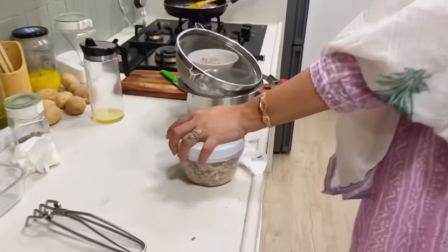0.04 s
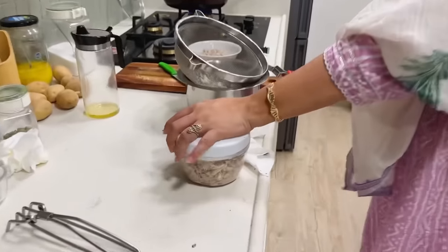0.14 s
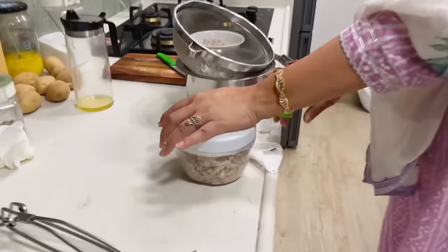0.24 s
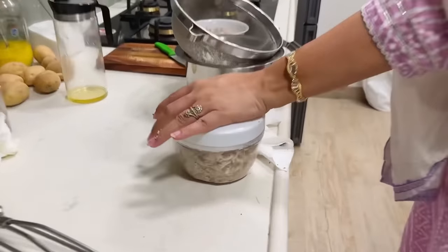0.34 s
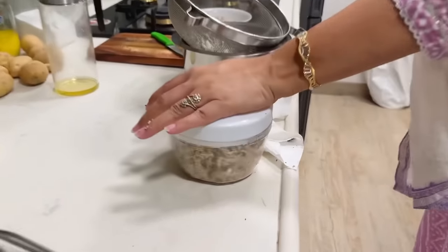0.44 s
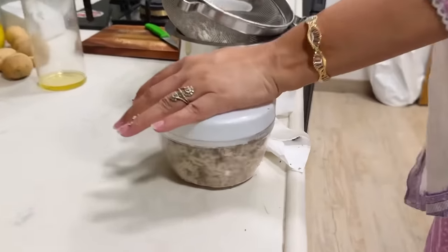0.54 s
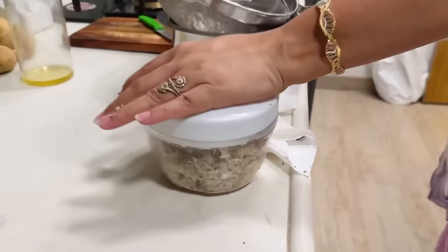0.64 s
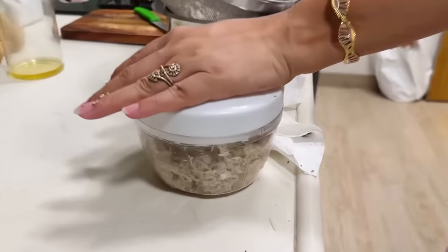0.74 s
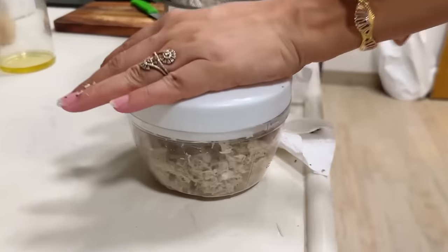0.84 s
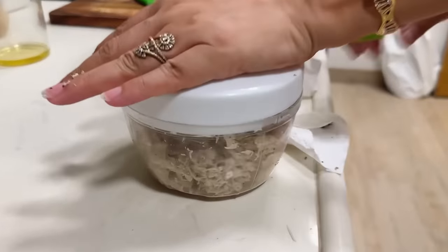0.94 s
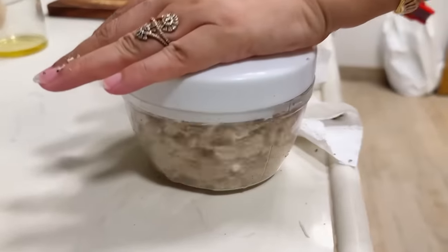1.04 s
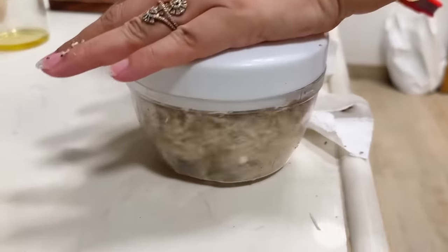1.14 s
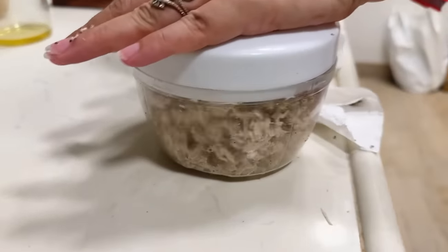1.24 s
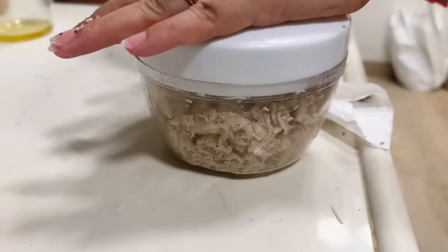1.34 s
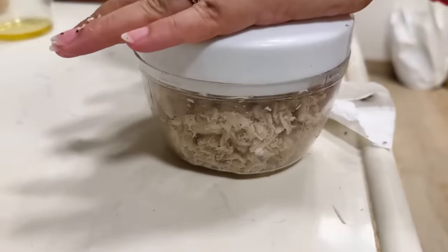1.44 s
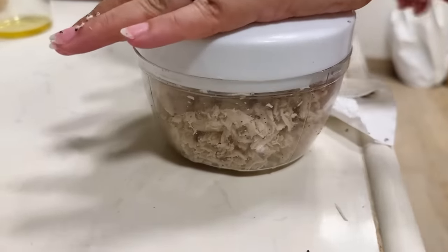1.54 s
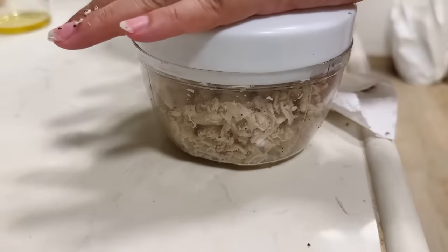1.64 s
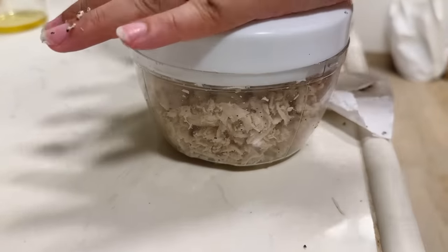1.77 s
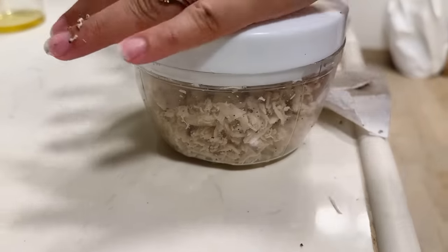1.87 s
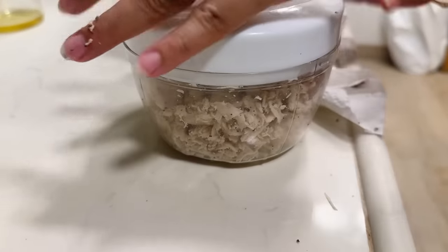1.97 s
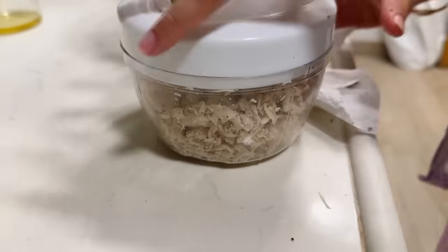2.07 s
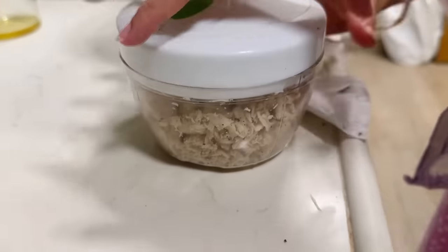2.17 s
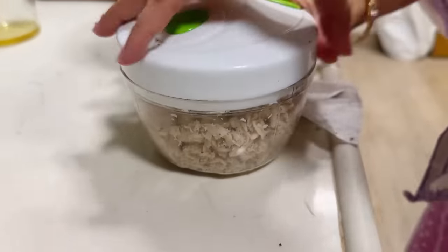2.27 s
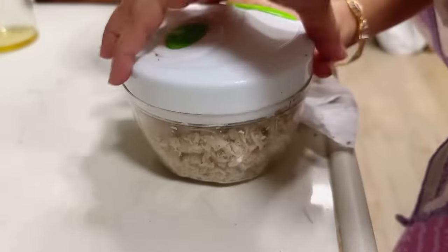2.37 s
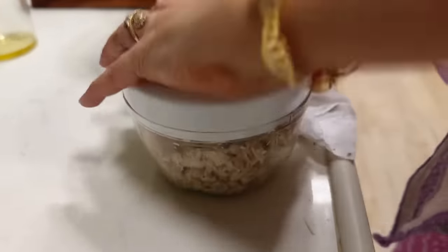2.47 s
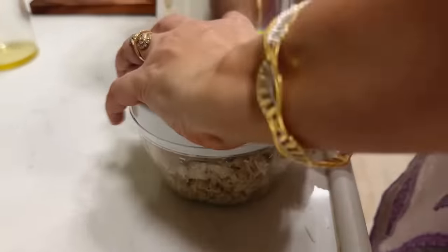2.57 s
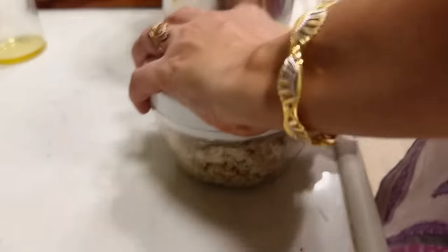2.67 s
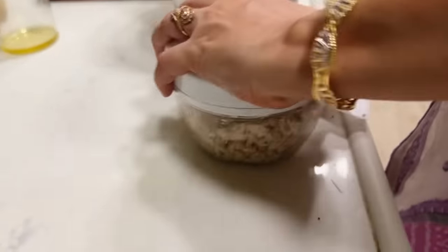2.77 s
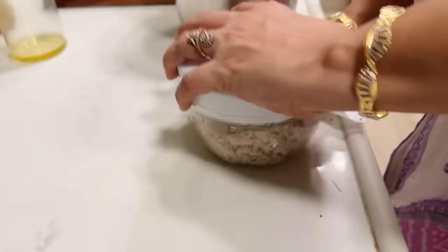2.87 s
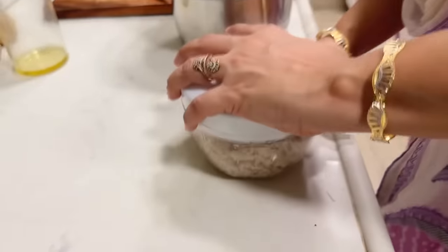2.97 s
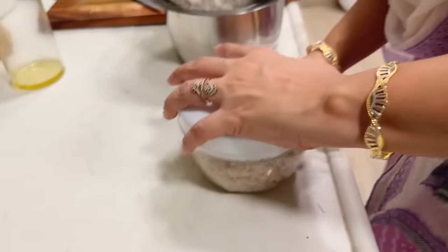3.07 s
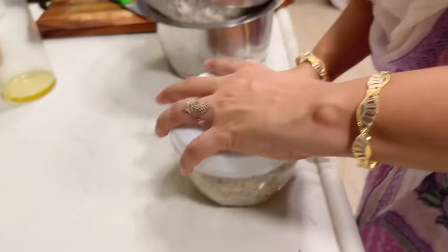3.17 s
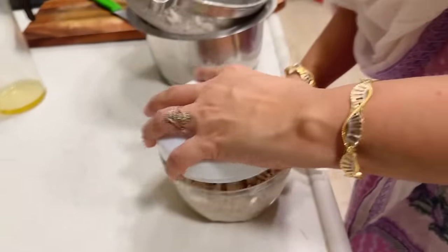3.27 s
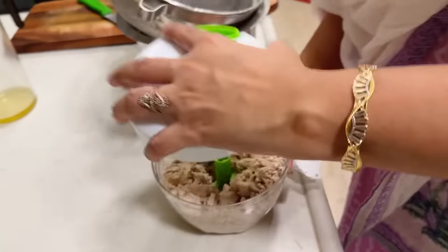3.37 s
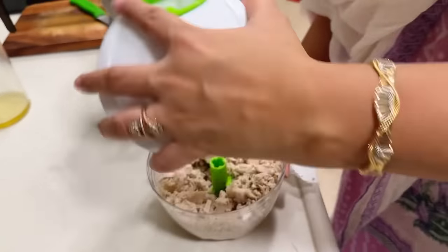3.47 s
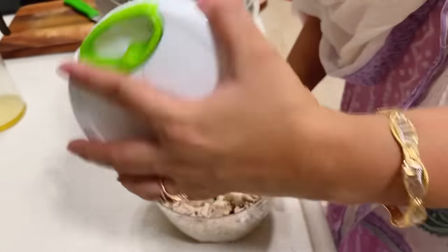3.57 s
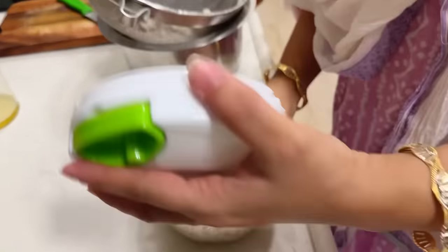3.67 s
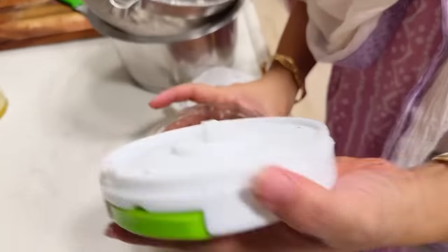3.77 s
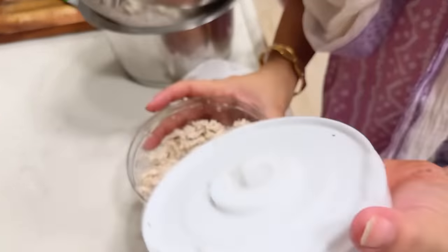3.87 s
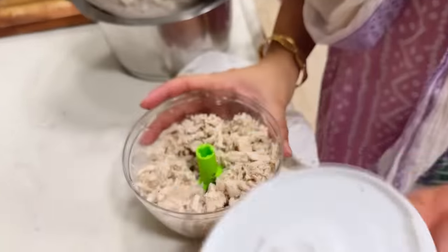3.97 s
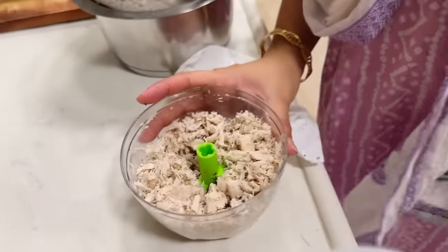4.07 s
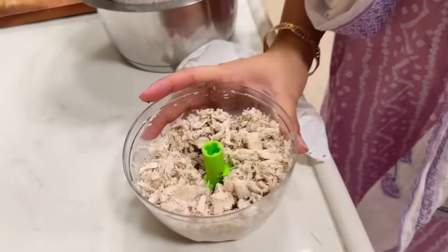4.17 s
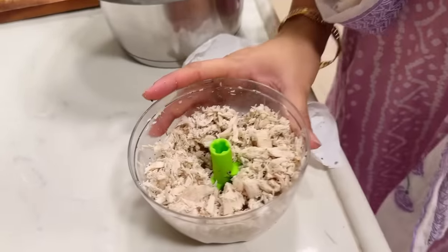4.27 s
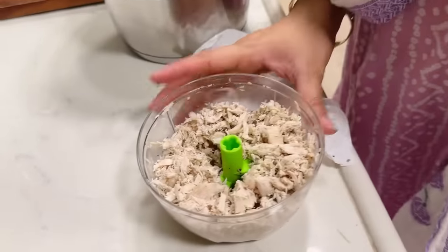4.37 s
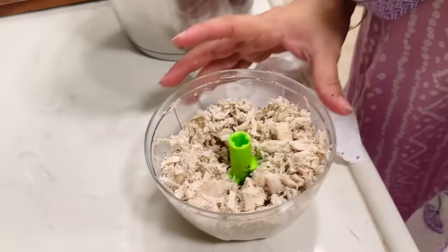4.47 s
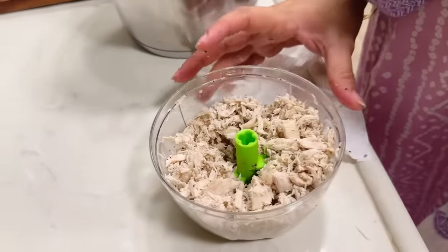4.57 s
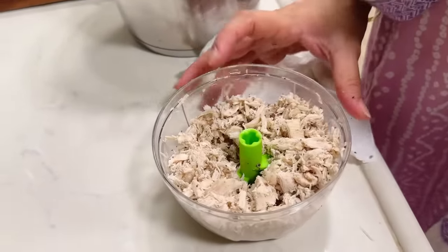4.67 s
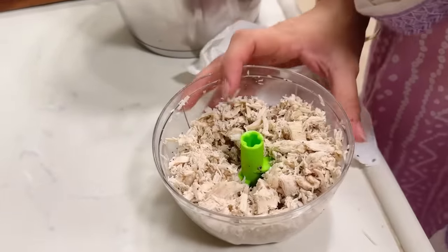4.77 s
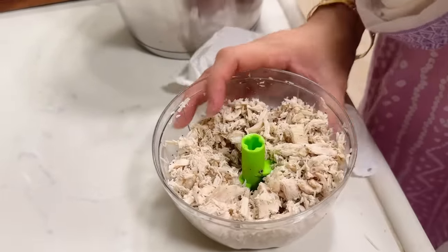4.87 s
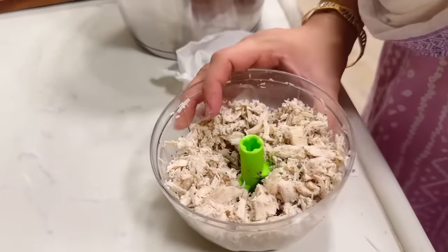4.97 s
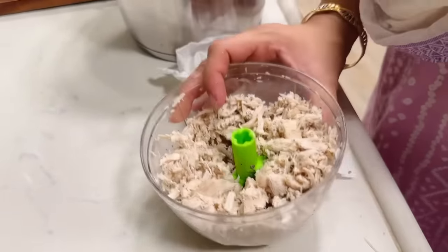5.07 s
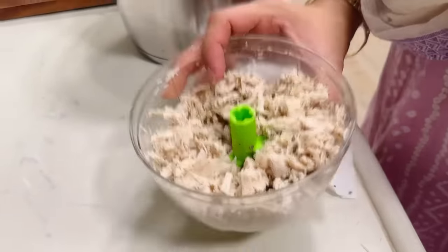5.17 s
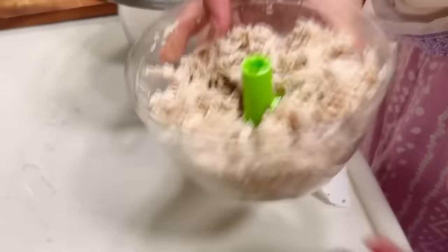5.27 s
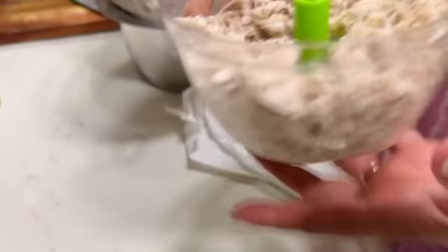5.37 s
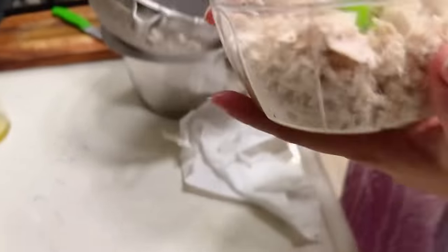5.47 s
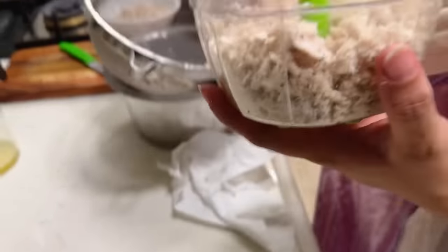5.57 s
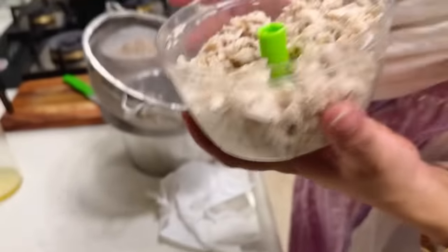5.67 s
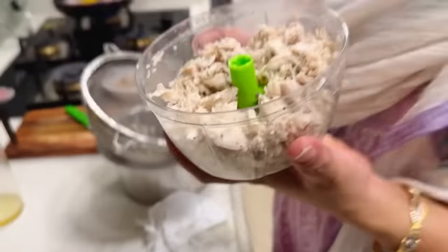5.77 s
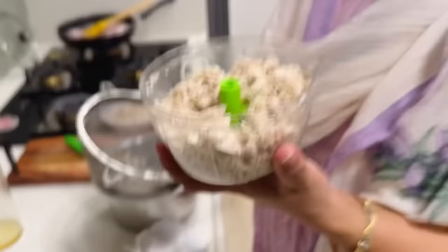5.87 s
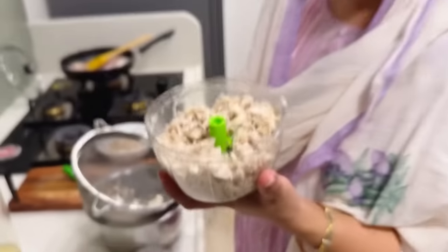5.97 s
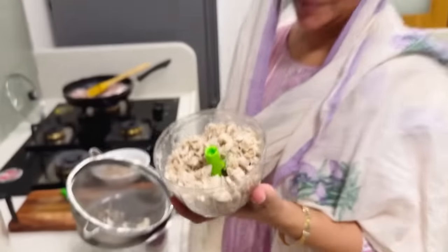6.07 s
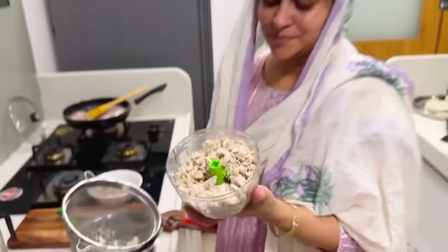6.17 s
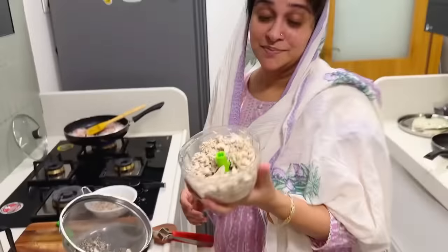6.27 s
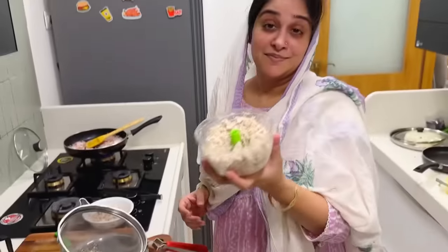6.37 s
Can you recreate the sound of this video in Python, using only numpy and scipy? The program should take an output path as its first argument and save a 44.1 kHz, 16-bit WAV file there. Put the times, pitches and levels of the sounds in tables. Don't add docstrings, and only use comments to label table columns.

```python
import sys
import numpy as np
from scipy import signal
from scipy.fft import rfft, irfft
from scipy.io import wavfile
from scipy.ndimage import uniform_filter1d

SR = 44100
rng = np.random.default_rng(int(sys.argv[2]) if len(sys.argv) > 2 else 0)


def voltage_ratio(decibels):
    exponent = np.asarray(decibels, float) / 20
    return 10 ** exponent


def transcribe(u):
    v = np.clip(np.atleast_2d(u).T, -1, 1)
    q = np.round(v * 32767).astype(np.int16)
    wavfile.write(sys.argv[1], SR, q)


N = 283286
T = np.arange(N) / SR


def along(table, n):
    hz, value = np.transpose(table)
    return np.interp(np.log(np.arange(n // 2 + 1) * SR / n + 1), np.log(hz), value)


def unit(x):
    return x / np.sqrt(np.mean(x ** 2))


def band(x, lo_hz, hi_hz):
    return signal.sosfilt(signal.butter(2, [lo_hz, min(hi_hz, SR / 2 - 100)], "band", fs=SR, output="sos"), x)


def decay(t, t60_s):
    return np.exp(-np.log(1000) * t / t60_s)


def body(x, modes):
    out = 0
    for k, (hz, width_hz, db) in enumerate(modes):
        out = out + (-1) ** k * voltage_ratio(db) * signal.lfilter(*signal.iirpeak(hz, hz / width_hz, fs=SR), x)
    return out


def widened(modes, factor):
    return [(hz, factor * width_hz + 60, db) for hz, width_hz, db in modes]


def grains(rate_hz, spread_db, fill):
    hit = rng.random(N) < rate_hz / SR
    clicks = hit * rng.standard_normal(N) * voltage_ratio(spread_db * np.minimum(rng.exponential(size=N), 4))
    return unit(clicks) + fill * rng.standard_normal(N)


def walk(rate_hz):
    k = int(SR / rate_hz)
    return uniform_filter1d(np.repeat(rng.standard_normal(N // k + 1), k), k)[:N]


def swell(rows, drop_db, bend):
    power = 0
    for start_s, top_s, end_s, db in rows:
        before = (top_s - T) / max(top_s - start_s, .002)
        after = (T - top_s) / max(end_s - top_s, .002)
        away = np.where(T < top_s, before, after)
        power = power + voltage_ratio(db - drop_db * away ** bend) ** 2
    return np.sqrt(power)


def add(out, s, x):
    i = int(s * SR)
    out[i:i + len(x)] += x[:N - i]


def strikes(table, spread, t60_s, gain_db, snap_db, crack_db):
    out, t = np.zeros(N), np.arange(5000) / SR
    for s, db, hz, contact_ms, bright_db in table:
        contact_s = np.clip(contact_ms, .2, 6) / 1000
        rise = 1 - np.exp(-(t / contact_s) ** 2)
        fade = rise * (np.exp(-t / (2.1 * contact_s + 0.00047)) + 0.25 * decay(t, 2.6 * t60_s))
        noise = rng.standard_normal((3, len(t))) * fade
        crowd = band(noise[0], hz / (1 + spread), hz * (1 + 1.47 * spread))
        ring = crowd / abs(crowd).max() + 0.91 * rise * np.sin(2 * np.pi * hz * t) * decay(t, t60_s)
        snap = band(band(noise[1], 900.0, 3200.0), 830.0, 3300.0)
        crack = band(noise[2], 2900.0, 13000.0)
        blow = ring / abs(ring).max()
        blow = blow + voltage_ratio(snap_db + bright_db + 2.0) * snap / abs(snap).max()
        blow = blow + voltage_ratio(crack_db + bright_db - 2.5) * crack / abs(crack).max()
        add(out, s + .0002, voltage_ratio(db + gain_db) * blow)
    return out


# (frequency [Hz], width [Hz], level [dB])
BOWL_MODES = [(361, 180, 15.5), (1050, 160, 3), (1223, 18, 4.5), (1880, 27, -9.5)]
RATCHET_MODES = [(860, 47, 2), (1300, 14, 4.5), (1600, 200, -2), (2235, 12, 2), (2200, 11, -2),
                 (2780, 600, -10), (3330, 44, -7.5), (3500, 24, -22)]
CORD_MODES = [(8140, 160, 8), (9640, 200, 9), (13500, 1500, -2)]
# (start [s], fastest [s], end [s], level [dB])
PULLS = [
    (-0.02, 0.14, 0.27, -40),
    (0.63, 0.725, 0.88, -31.5),
    (1.25, 1.36, 1.58, -29.5),
    (1.5, 1.64, 1.8, -46.5),
]
REWINDS = [
    (-0.07, 0.14, 0.25, -37),
    (0.25, 0.45, 0.6, -34),
    (0.62, 0.74, 0.86, -36),
    (0.9, 1.09, 1.23, -31),
]
JERKS = [
    (0.9, 0.911, 0.94, -24),
]
SNAPS = [
    (1.735, 1.76, 1.885, -22),
]
# (level [dB], drop at stroke ends [dB])
PULL_MIX = [(0, 16), (-10, 14), (-18, 8), (-8.5, 22)]
REWIND_MIX = [(-4, 20), (0, 17), (-12, 9), (-16, 14)]
JERK_MIX = [(-6, 26), (5, 25), (-17, 12), (-8, 26)]
SNAP_MIX = [(-30, 30), (-1, 24), (0, 25), (-8, 30)]


def chopper():
    kinds = [(PULLS, PULL_MIX, 1.7), (REWINDS, REWIND_MIX, 1.5), (JERKS, JERK_MIX, .95), (SNAPS, SNAP_MIX, .95)]
    thuds = grains(800., 2.4, .5)
    churn = body(thuds, widened(BOWL_MODES, 1.07)) + voltage_ratio(-25) * band(thuds, 130.0, 1400.0)
    ticks = grains(900., 2.5, .55)
    pawls = body(ticks, widened(RATCHET_MODES, 1.25)) + voltage_ratio(-22.5) * band(ticks, 470.0, 2000.0)
    scrape = band(grains(2500., 1.1, 1.0), 2530.0, 8700.0)
    rub = grains(1500., 1.7, .8)
    cord = body(rub, CORD_MODES) + voltage_ratio(-9) * band(rub, 10500.0, 18600.0)
    out = 0
    for k, layer in enumerate((churn, pawls, scrape, cord)):
        power = 0
        for rows, mix, bend in kinds:
            level_db, drop_db = mix[k]
            power = power + (voltage_ratio(level_db) * swell(rows, drop_db, bend)) ** 2
        out = out + np.sqrt(power) * unit(layer)
    return out


# (time [s], peak level [dB], ring [Hz], contact [ms], brightness [dB])
GEAR_KNOCKS = [(0.083, -24.5, 700, 2.5, 3), (0.127, -20.5, 503, 3.4, 0), (0.2755, -11, 777, 2.6, 3),
               (0.31, -26, 1385, 3, -12), (0.396, -14.5, 900, 1.2, -1), (0.407, -23.5, 1330, 2.2, 4),
               (0.458, -19, 1400, 1.8, 6), (0.485, -17.5, 1750, 2.5, 1), (0.627, -33, 1400, 3, -4),
               (0.904, -15, 560, 3, -8), (0.909, -11, 1600, 1.34, -3), (1.0105, -14, 1014, 0.6, 0),
               (0.993, -24, 800, 3, -8), (1.025, -17, 600, 2, -8), (1.078, -20, 330, 2, -6),
               (1.148, -18, 1700, 1.5, 0), (0.925, -19, 1400, 1.2, 0), (0.95, -24, 1000, 1.5, 0),
               (1.03, -11.5, 1284, 1.8, 6), (1.0335, -13, 600, 0.8, 0), (1.049, -17, 526, 0.82, 2),
               (1.062, -17, 803, 1.6, 5), (1.14, -15, 1495, 1.2, -1), (1.174, -19, 860, 1.6, 2),
               (1.25, -32, 750, 3, -4), (1.337, -14.5, 806, 1.5, -6), (1.384, -16.5, 647, 1.3, -2),
               (1.456, -22, 590, 4, -12), (1.681, -32, 750, 3.5, 0)]


def gear_knocks():
    return strikes(GEAR_KNOCKS, spread=0.56, t60_s=0.062, gain_db=-4.15, snap_db=-11, crack_db=-25)


# (time [s], peak level [dB], ring [Hz], contact [ms], brightness [dB])
PAWL_CRACKS = [
    (0.473, -10, 1690, 0.5, 3),
    (1.099, -15, 1570, 0.54, -2),
    (1.1152, -3.5, 1100, 0.25, 2),
    (1.1295, -6, 1400, 0.5, -9),
]


def pawl_cracks():
    return strikes(PAWL_CRACKS, spread=0.72, t60_s=0.034, gain_db=-3.9, snap_db=-5, crack_db=-36)


# (time [s], peak level [dB], ring [Hz], contact [ms], brightness [dB])
HANDLE_CLATTER = [(1.7403, -8, 800, 0.6, 2), (1.754, -7, 1393, 0.3, 5), (1.7555, -7, 900, 0.5, 0),
                  (1.762, -5, 620, 0.59, -3), (1.7658, -8, 1250, 0.3, -1), (1.7685, -7, 520, 0.8, -6),
                  (1.7765, -6, 580, 0.7, -3), (1.7805, -14, 900, 0.5, 0), (1.7945, -18, 1100, 0.5, 2),
                  (1.838, -26, 1000, 1, -2)]


def handle_clatter():
    return strikes(HANDLE_CLATTER, spread=0.72, t60_s=0.02, gain_db=-3.9, snap_db=-4, crack_db=-9)


# (time [s], peak level [dB], ring [Hz], contact [ms], brightness [dB])
BOWL_JOLTS = [
    (.472, -17, 650, 3.7, -25),
    (1.756, -16, 329, 3.7, -25),
    (1.767, -19, 500, 1.2, -25),
    (2.786, -39, 655, 0.8, -6),
    (2.862, -42, 220, 3, -25),
    (4.5062, -17, 1900, 0.5, -8),
]


def bowl_jolts():
    return strikes(BOWL_JOLTS, spread=0.51, t60_s=0.063, gain_db=-0.72, snap_db=-3, crack_db=-19)


# (start [s], strongest [s], end [s], level [dB])
SPRING_SHIVERS = [
    (1.74, 1.744, 1.76, -38),
    (1.753, 1.765, 1.86, -27),
]
# (frequency [Hz], width [Hz], level [dB])
SPRING_MODES = [(2020, 60, 2), (2850, 60, -3), (3040, 70, -1), (3460, 60, -2), (4870, 60, 2), (5210, 60, 0),
                (5540, 90, -1), (6750, 60, 0), (7120, 80, 1), (8220, 200, -5)]


def spring():
    return swell(SPRING_SHIVERS, 22, 1.1) * unit(body(grains(700., 2.5, .3), SPRING_MODES))


# (time [s], level [dB], contact length [s], first pitch above the ring [Hz])
LID_LANDING = [
    (4.5065, -2, 0.006, 650),
    (4.5165, -24, 0.003, 100),
    (4.5217, -11, 0.003, 220),
    (4.531, -27, 0.004, 120),
    (4.5392, -17, .0045, 150),
    (4.555, -26, 0.007, 50),
    (4.575, -30, .006, 50),
    (4.60, -31, 0.0039, 50),
]
# (frequency [Hz], level [dB], t60 [s])
LID_MODES = [(345, -24, .04), (506, -30, 0.3), (617, -24, 0.14), (904, -24, .09), (1082, -9, 0.04),
             (1195, -22, 0.1), (1523, -20, 0.08), (1776, -30, .1), (2110, -21, .05), (2309, -27, .07),
             (2670, -24, 0.06), (2853, -31, .1), (3343, -30, .07), (3989, -36, .1)]


def lid_landing():
    ring_hz, glide_s = 480, 0.001
    out, t = np.zeros(N), np.arange(9000) / SR
    for s, db, length_s, rise_hz in LID_LANDING:
        turns = ring_hz * t + rise_hz * glide_s * (1 - np.exp(-t / glide_s))
        envelope = (1 - np.exp(-t / (0.12 * length_s))) * np.exp(-(t / (1.14 * length_s)) ** 2)
        add(out, s, voltage_ratio(db) * np.sin(2 * np.pi * turns) * envelope)
    ring = sum(voltage_ratio(db) * np.sin(2 * np.pi * hz * t) * decay(t, t60_s) for hz, db, t60_s in LID_MODES)
    noise = rng.standard_normal((2, len(t)))
    slap_fade = np.exp(-t / 0.0058) + 0.31 * np.exp(-t / 0.038)
    slap = voltage_ratio(-10) * band(noise[0] * slap_fade, 800.0, 1600.0)
    crack_fade = np.exp(-t / 0.0039) + 0.19 * np.exp(-t / 0.03)
    crack = voltage_ratio(-21) * band(noise[1] * crack_fade, 3000., 14500.)
    onset = 1 - np.exp(-(t / .0007) ** 2)
    add(out, LID_LANDING[0][0] - .0008, onset * (ring + slap + crack))
    return out


# (time [s], peak level [dB], ring [Hz], contact [ms], brightness [dB])
LID_ROCKS = [(4.677, -28, 320, 2.2, -12), (4.816, -37, 1380, 1.3, -6), (4.843, -28, 330, 0.8, -4),
             (4.859, -15.5, 420, 0.4, -8), (4.871, -23, 400, 0.9, -8), (4.885, -28, 550, 0.8, -8),
             (4.8895, -22, 330, 1.2, -8), (4.949, -19, 430, 0.6, -8), (4.958, -21, 420, 0.8, -8),
             (4.966, -30, 380, 1.2, -8), (4.984, -25, 560, 0.8, -8), (4.987, -20, 400, 1.0, -8),
             (4.997, -25, 520, 1.2, -8), (5.011, -29, 480, 1.2, -8), (5.027, -30.5, 490, 1.0, -6)]


def lid_rocks():
    return strikes(LID_ROCKS, spread=0.28, t60_s=0.032, gain_db=-2.5, snap_db=-17, crack_db=-26)


# (time [s], level [dB], tilt [dB per octave])
EDGE_CLICKS = [
    (4.857, -42, -1),
    (4.86, -36, -5),
    (4.8848, -34, 1),
    (4.9473, -32, 1),
    (4.9818, -29, 0),
    (4.9902, -35, -2),
    (4.996, -35, -5),
    (5.027, -44, 1),
]
# (frequency [Hz], level [dB], t60 [s])
EDGE_MODES = [(1147, 0, .05), (1303, -3, .04), (1480, -2, .025), (1669, -8, .03), (1863, -8, .025),
              (2150, -5, .025), (2300, -8, .02), (2632, -10, .015)]


def lid_edge():
    out, t = np.zeros(N), np.arange(4000) / SR
    for s, db, tilt_db in EDGE_CLICKS:
        ring = 0
        for hz, mode_db, t60_s in EDGE_MODES:
            luck = rng.standard_normal()
            gain = voltage_ratio(mode_db + 2.5 * luck + tilt_db * np.log2(hz / 1200))
            ring = ring + gain * np.sin(2 * np.pi * hz * (1 + .01 * luck) * t) * decay(t, t60_s)
        add(out, s, voltage_ratio(db) * ring * (1 - np.exp(-t / .0003)))
    return out


# (time [s], peak level [dB], ring [Hz], contact [ms], brightness [dB])
GRIT_SCUFFS = [
    (4.857, -33, 5800, 2.2, 0),
    (4.9465, -30, 6000, 1.6, -3),
]


def grit_scuffs():
    return strikes(GRIT_SCUFFS, spread=0.3, t60_s=0.01, gain_db=-0.72, snap_db=-5, crack_db=-16)


# (time [s], peak level [dB], ring [Hz], contact [ms], brightness [dB])
FINGER_TAPS = [(2.203, -41.5, 1250, 1.3, 3), (2.243, -44.5, 474, 0.82, 8), (2.49, -43, 1223, 1.3, 5),
               (2.517, -40, 353, 0.96, 2), (2.549, -37, 358, 2.1, -2), (2.785, -35, 1120, 0.9, 0),
               (2.857, -31, 715, 2, 5), (3.196, -36, 500, 2.3, -9), (3.267, -33, 600, 1.5, -1),
               (3.564, -40, 330, 2, -6), (3.819, -50, 1330, 1.3, 12), (4.181, -39, 1236, 1.3, -5),
               (4.221, -33.5, 1500, 1.3, -12), (4.445, -39.5, 437, 1.9, 6), (5.436, -34, 974, 0.85, -1)]


def finger_taps():
    return strikes(FINGER_TAPS, spread=0.4, t60_s=0.059, gain_db=-1.5, snap_db=-9, crack_db=-18)


# (time [s], peak level [dB], ring [Hz], contact [ms], brightness [dB])
METAL_TICKS = [(2.093, -38, 3890, 0.64, 13), (2.3335, -38, 6250, 0.7, -3), (2.7494, -36.5, 9100, 0.8, -1),
               (3.251, -35, 3580, 0.7, -16), (3.3677, -36, 13800, 0.8, -2), (3.4994, -43, 8640, 0.8, 1),
               (3.8203, -40, 8470, 0.8, 5), (4.0672, -40, 6640, 0.8, 1), (4.116, -34, 13600, 0.63, -4),
               (5.3896, -39, 6130, 1.4, -4), (5.5398, -32, 7670, 0.8, 0), (6.143, -42, 7700, 0.8, 0)]


def metal_ticks():
    return strikes(METAL_TICKS, spread=0.15, t60_s=0.035, gain_db=-3.5, snap_db=-14, crack_db=-6)


# (time [s], length [s], frequency [Hz], level [dB])
STEEL_RIMS = [(5.21, .11, 2390, -63), (5.58, .19, 2320, -64), (3.9, .1, 1300, -66), (2.74, .05, 1180, -60),
              (5.235, .08, 1550, -59.5), (5.85, .2, 1600, -66), (5.66, .25, 1220, -66)]


def steel_rims():
    out = 0
    for s, length_s, hz, db in STEEL_RIMS:
        envelope = np.clip(1 - abs(2 * (T - s) / length_s - 1), 0, .4) * 2.5
        out = out + voltage_ratio(db) * unit(band(rng.standard_normal(N), hz - 30, hz + 30)) * envelope
    return out


# (start [s], strongest [s], end [s], level [dB])
SLIDES = [
    (3.0, 3.17, 3.28, -51),
    (6.11, 6.154, 6.23, -56),
    (6.23, 6.27, 6.6, -47.5),
]
# (start [s], strongest [s], end [s], level [dB])
DRAGS = [
    (1.85, 1.96, 2.2, -57),
    (2.44, 2.53, 2.6, -56),
    (3.23, 3.27, 3.31, -50),
    (4.49, 4.52, 4.76, -54),
    (4.74, 4.874, 5.1, -49),
    (5.8, 6.1, 6.4, -60),
    (6.24, 6.296, 6.36, -51),
    (6.34, 6.42, 6.5, -55),
]
# (time [s], level [dB])
PAN_LEVEL = [(0, -61), (1.9, -61.5), (2.05, -57), (3.6, -58), (4.1, -56.5), (5.1, -58), (6.42, -57)]
# (frequency [Hz], level [dB per Hz])
FINE_SPECTRUM = [(700, -33), (1200, -5.5), (2300, -4.5), (5000, -5.5), (8500, -3), (12600, -11),
                 (16000, -3)]


def rubbing_and_pan():
    fine = unit(irfft(rfft(grains(3000., 0.76, 1.0)) * voltage_ratio(along(FINE_SPECTRUM, N)), N))
    dull = unit(band(grains(500., 1.4, 1.0), 310.0, 1480.0))
    pan = voltage_ratio(np.interp(T, *np.transpose(PAN_LEVEL)))
    bright = pan * fine + swell(SLIDES, 13, 2.6) * band(fine, 1400., 17000.)
    dull_gain = np.hypot(pan * voltage_ratio(-5.5), swell(DRAGS, 9, 1.3))
    return voltage_ratio(5.0) * bright + voltage_ratio(0.6) * dull_gain * dull


# (time [s], level [dB])
WEIGHT_SHIFTS = [(0.14, -46), (0.49, -41), (1.05, -41), (1.39, -55), (1.77, -39), (2.22, -53), (2.54, -47),
                 (2.82, -45), (3.2, -45), (4.54, -50), (4.77, -46), (5.02, -41), (5.45, -46), (6.1, -49),
                 (6.35, -55)]


def heave():
    rise_s, fall_s, rest_db = .08, .14, -60
    pushes = swell([(s - rise_s, s, s + fall_s, db) for s, db in WEIGHT_SHIFTS], 11, 1.1)
    return voltage_ratio(-5.0) * np.hypot(pushes, voltage_ratio(rest_db)) * unit(band(rng.standard_normal(N), 55., 232.0))


# (frequency [Hz], phase [rad])
SIDE_LEAD = [(100, 1.36), (400, 0.55), (1200, 1.75), (2500, 1.8), (5000, 1.04), (9000, 1.33), (14000, 1.6)]


def ports(x, side_db):
    t = np.arange(2000) / SR
    echoes = rng.standard_normal(len(t)) * np.exp(-t / .014)
    echoes = echoes / np.sqrt(np.sum(echoes ** 2))
    paths = np.exp(1j * along(SIDE_LEAD, N)) + voltage_ratio(-2.5) * rfft(echoes, N)
    side = irfft(rfft(x) * voltage_ratio(along(side_db, N) - 5) * paths, N)
    return np.array([x + side, x - side])


def room(x):
    t60_s, treble_t60_s, level_db = 0.27, 0.24, -12
    t = np.arange(SR // 2) / SR
    noise = rng.standard_normal((2, len(t))) * (1 - np.exp(-t / 0.0013))
    tail = band(noise, 67.0, 2870.0) * voltage_ratio(-60 * t / t60_s)
    tail = tail + 0.9 * band(noise, 3000.0, 18700.0) * voltage_ratio(-60 * t / treble_t60_s)
    tail = tail / np.sqrt(np.sum(tail ** 2) / 2)
    return voltage_ratio(level_db) * signal.fftconvolve(x[None], tail, axes=1)[:, :N]


# (frequency [Hz], level [dB per Hz])
KITCHEN_SPECTRUM = [(15, -39), (28, -13), (45, -1), (68, 8), (100, 6), (146, -5), (313, 0), (483, -15.5),
                    (1250, -20), (3500, -26.5), (6500, -14.5), (8400, -24), (10000, -44.5), (13500, -17.5),
                    (16000, -57.5)]
# (frequency [Hz], likeness [-1 to 1])
PORT_LIKENESS = [(60, 1), (130, -0.56), (290, -0.21), (640, -0.09), (1410, -0.09), (3100, 0), (6820, 0.55),
                 (15000, 0.7)]


def kitchen():
    level_db = -50
    opposite = np.array([[1], [-1]])
    low = np.clip(along([(90, 0.83), (300, 0)], N), 0, 1)
    alike = np.clip(along(PORT_LIKENESS, N), -.9, .99)
    mid, side = (rfft(rng.standard_normal(N)) * voltage_ratio(along(KITCHEN_SPECTRUM, N)) for _ in range(2))
    pair = mid * np.sqrt(1 + alike) + side * np.sqrt(1 - alike) * opposite
    rumble = irfft(pair * low, N) * voltage_ratio(0.46 * walk(3.7))
    sizzle = irfft(pair * (1 - low), N) * voltage_ratio(0.77 * walk(11.0))
    duct = voltage_ratio(-7) * unit(band(rng.standard_normal(N), 170., 290.)) * opposite
    return voltage_ratio(level_db - 2.5) * (unit(rumble + sizzle) + duct)


# (frequency [Hz], level [dB])
CHOPPER_SIDE = [(60, -6), (110, -5), (200, -5), (380, -10), (700, -5.5), (1290, 3), (2380, 0), (4400, -0.5),
                (8120, 0.5), (15000, 4.5)]
LID_SIDE = [(60, -11), (110, 1), (200, -13), (380, -16), (700, -6), (1290, 1), (2380, 0), (4400, 0),
            (8120, 2), (15000, 7)]


def scene():
    machine = chopper() + gear_knocks() + pawl_cracks() + handle_clatter() + bowl_jolts()
    machine = machine + spring() + grit_scuffs()
    hands = lid_landing() + lid_rocks() + lid_edge() + finger_taps() + metal_ticks()
    hands = hands + steel_rims() + rubbing_and_pan() + heave()
    near = ports(machine, CHOPPER_SIDE) + ports(hands, LID_SIDE)
    return near + room(machine + hands) + kitchen()


def roll_off(x):
    return signal.sosfilt(signal.butter(12, 16840, fs=SR, output="sos"), x)


def record(dry):
    gap_lo_hz, gap_hi_hz, side_top_hz, top_hz = 10400, 12200, 13400, 15900
    dry = 1.25 * np.tanh(dry / 1.25)
    mid, side = rfft(dry[0] + dry[1]) / 2, rfft(dry[0] - dry[1]) / 2
    # (frequency [Hz], gain [dB])
    mid_gain = [(gap_lo_hz - 150, 0), (gap_lo_hz + 150, -55), (gap_hi_hz - 150, -55), (gap_hi_hz + 150, 0),
                (top_hz - 150, 0), (top_hz + 250, -55)]
    side_gain = [(8100, 0), (8600, -9), (9200, 0), (side_top_hz - 300, 0), (side_top_hz + 200, -45), (top_hz, -70)]
    mid *= voltage_ratio(along(mid_gain, N))
    side *= voltage_ratio(along(side_gain, N))
    mix = irfft(np.array([mid + side, mid - side]), N)
    return roll_off(mix)


dry = scene()
out = record(dry)
transcribe(out)
```